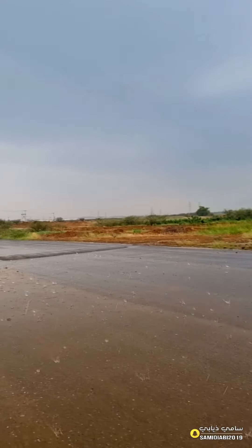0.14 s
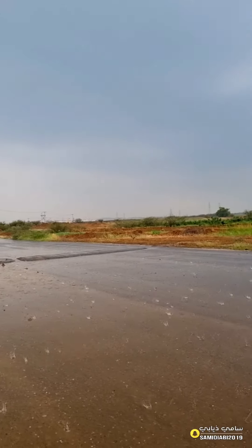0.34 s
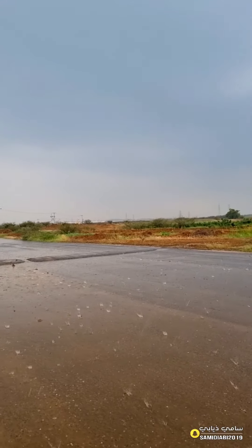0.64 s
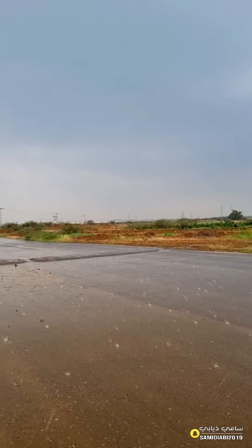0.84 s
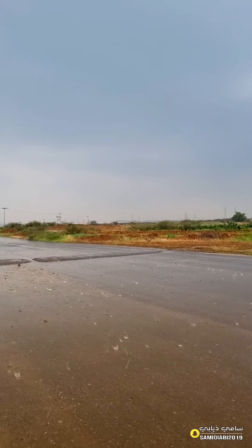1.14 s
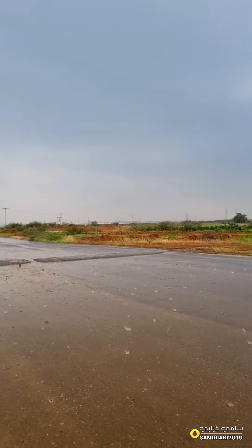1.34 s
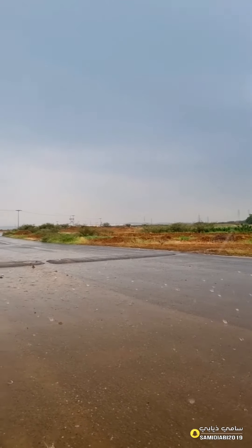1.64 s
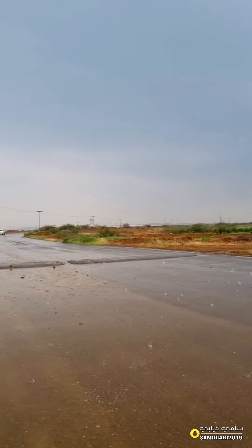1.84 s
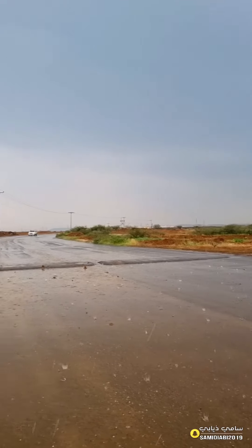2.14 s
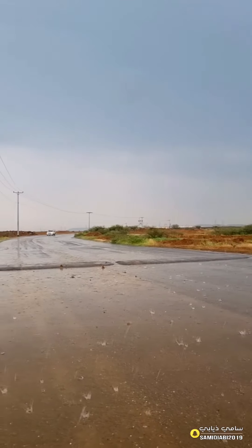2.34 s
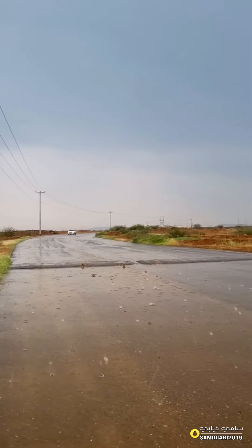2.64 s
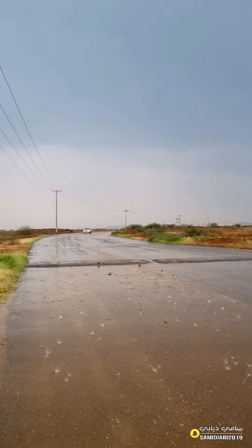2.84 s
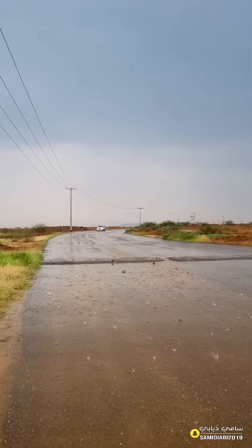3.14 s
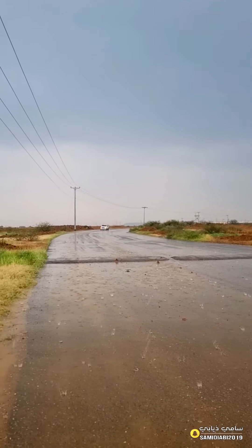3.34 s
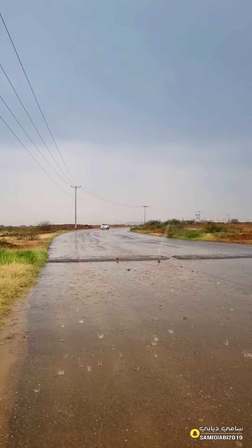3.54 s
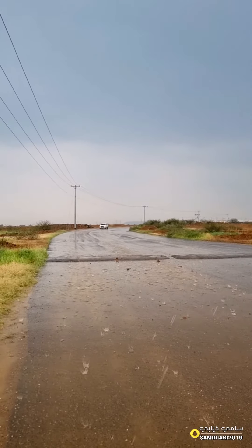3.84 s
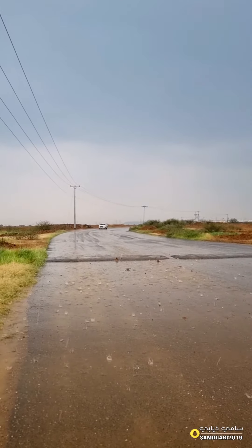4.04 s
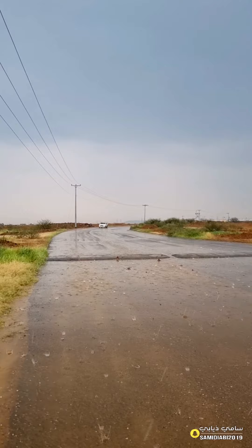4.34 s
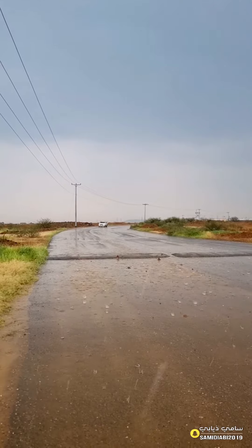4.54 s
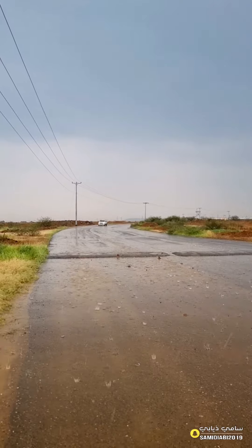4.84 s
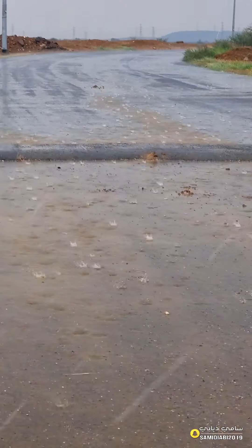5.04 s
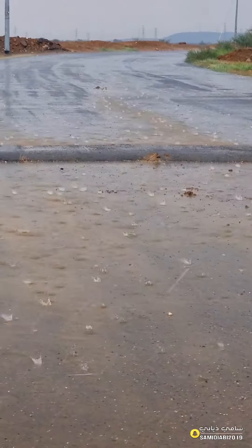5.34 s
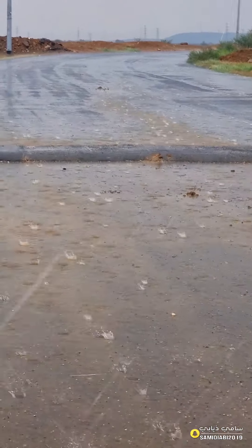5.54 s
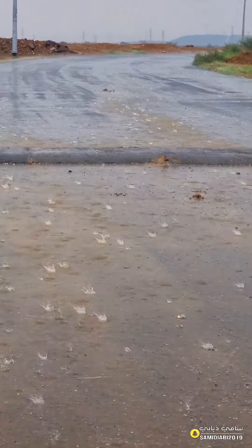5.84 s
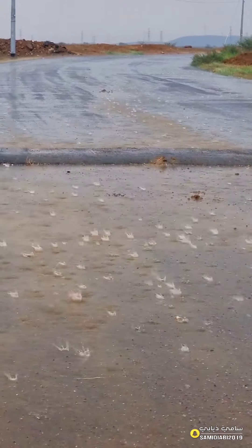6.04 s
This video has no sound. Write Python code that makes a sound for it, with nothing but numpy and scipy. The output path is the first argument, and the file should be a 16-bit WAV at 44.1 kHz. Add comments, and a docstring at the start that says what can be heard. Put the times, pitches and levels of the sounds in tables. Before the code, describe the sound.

A handheld phone under an umbrella hears rain close overhead and on an open asphalt road around. From 0 to 1.5 seconds, scattered dull pops on taut cloth mix with low, uneven wind puffs thumping the microphones, over a faint, steady splashing hiss. From about 1.6 to 3 seconds wind eases and drops come faster, with tight clusters and small wet ticks; crisp road splashes crack around 2.3 and 3.6. The patter thickens through 4 to 4.8, with heavy thuds near 4.35. At 4.93 sound drops out completely for under a tenth of a second. It returns with a different road hiss, a very fine high sizzle and deeper cloth thuds. A sharp splash snaps at 5.36. Wind rises from 5.3, and around 5.9 to 6.15 rough gusts buffet strongly, with a short dull metallic ping at 5.93, a brief sizzle swell, and a final heavy drop near 6.2.

```python
"""Rain pats on the taut cloth of an umbrella just overhead, heard at a handheld phone's two microphones.
Each drop is a slowing swing of the cloth with spray and a dull canopy ring; one drop pings a bare rib.
Splashes on an open asphalt road are clicks and noise merged into hiss, with sharp cracks close by.
Wind is coloured noise, and single gusts are runs of unsteady swings.
Near five seconds the sound drops out briefly; it returns with a changed road hiss, a fine sizzle and rising wind."""
import sys
import numpy as np
from scipy import signal
from scipy.fft import rfft, irfft, next_fast_len
from scipy.io import wavfile
from scipy.ndimage import uniform_filter1d

SR = 44100
rng = np.random.default_rng(int(sys.argv[2]) if len(sys.argv) > 2 else 0)


def generate_wav(signal):
    """Clip the signal to [-1, 1] and save it as 16-bit WAV at the path in sys.argv[1]."""
    frames = np.transpose(np.atleast_2d(signal))
    scaled = np.clip(frames, -1, 1) * 32767
    pcm = np.round(scaled).astype(np.int16)
    wavfile.write(sys.argv[1], SR, pcm)


N = 273850

TIME = np.arange(N) / SR
GRAIN = np.arange(2048) / SR  # time line of one short sound, s
FIRST = int(0.004 * SR)  # samples in the first 4 ms, where struck sounds are levelled
DROPOUT_START_S, DROPOUT_END_S = 4.9341, 4.9994
# how much later the right microphone hears the cloth, before and after the dropout, and its scatter
LAG_EARLY_MS, LAG_LATE_MS, LAG_SCATTER_MS = 0.43, 0.12, 0.18


def undb(db):
    """Decibels to gain."""
    return 10 ** (np.asarray(db) / 20)


def unit(x):
    """Scale to rms 1."""
    return x / np.sqrt(np.mean(x ** 2))


def colour(x, points, causal=False):
    """Filter by (f/Hz, level/dB) points; the causal, minimum-phase form keeps attacks sharp."""
    size = next_fast_len(x.shape[-1] + 512, True) // 2 * 2
    hz, db = np.transpose(points)
    f = np.maximum(np.arange(size // 2 + 1) * SR / size, 1)
    gain = undb(np.interp(np.log(f), np.log(hz), db))
    if causal:
        # folding the cepstrum onto positive time gives minimum phase
        cepstrum = irfft(np.log(gain))
        cepstrum[1:size // 2] *= 2
        cepstrum[size // 2 + 1:] = 0
        gain = np.exp(rfft(cepstrum))
    return irfft(rfft(x, size) * gain)[..., :x.shape[-1]]


def walk(rate):
    """Random levels held for 1 / rate s, smoothed twice and scaled to rms 1."""
    hold = int(SR / rate)
    held = np.repeat(rng.standard_normal(N // hold + 1), hold)
    smooth = uniform_filter1d(uniform_filter1d(held, hold), hold)
    return unit(smooth[:N])


def pair(likeness):
    """White noise at two microphones with the given correlation."""
    mid, side = rng.standard_normal((2, N))
    c = np.clip(likeness, -1, 1)
    opposite = np.array([[1], [-1]])
    return (np.sqrt(1 + c) * mid + np.sqrt(1 - c) * side * opposite) / np.sqrt(2)


def struck(grains):
    """Scale each grain to rms 1 over its first 4 ms."""
    return grains / np.sqrt(np.mean(grains[:, :FIRST] ** 2, axis=1, keepdims=True))


def burst(count, points, decay_s, scatter=0):
    """Short coloured noise bursts, one a row, each shifted up or down in pitch by chance."""
    noise = rng.standard_normal((count, len(GRAIN))) * np.exp(-GRAIN / decay_s)
    speeds = np.exp(scatter * rng.standard_normal(count))
    grains = colour(noise, points, causal=True)
    shifted = [np.interp(GRAIN * speed, GRAIN, grain, right=0) for grain, speed in zip(grains, speeds)]
    return struck(np.array(shifted))


def crack(count, points, decay_s, tilt_db=2.0, bump_db=5.5, bump_hz=2900, bump_octaves=0.35):
    """Short broad ticks, one a row; each has a chance treble tilt and a favoured band of its own."""
    fade = np.exp(-GRAIN / decay_s)
    noise = rng.standard_normal((count, len(GRAIN)))
    tilt, centre = rng.standard_normal((count, 2)).T[:, :, None]
    spectra = rfft(noise * fade)
    f = np.arange(spectra.shape[1]) * SR / len(GRAIN)
    octaves = np.log2(np.maximum(f, bump_hz / 4) / bump_hz)
    bump = np.exp(-((octaves - centre / 2) / bump_octaves) ** 2)
    db = tilt_db * tilt * octaves + bump_db * bump
    # evening out the random spectrum makes the ticks more alike; a mild second fade tightens the tail
    even = spectra / np.abs(spectra) ** 0.6
    ticks = irfft(even * undb(db)) * fade ** 0.2
    return struck(colour(ticks, points, causal=True))


def place(grains, times, db, lag_ms):
    """Lay grains on the time line; a positive lag delays the right microphone, a negative one the left."""
    out = np.zeros((2, N + 2 * len(GRAIN)))
    for grain, t, gain, lag_s in zip(grains, times, undb(db), lag_ms / 1000):
        for side, late_s in enumerate((max(-lag_s, 0), max(lag_s, 0))):
            i = int(np.clip((t + late_s) * SR, 0, N))
            out[side, i:i + len(grain)] += gain * grain
    return out[:, :N]


def road(early_db=-41, late_db=-39.5, rate=2000, spread_db=6.5, grain_db=1, flicker_db=2.5,
         sizzle_db=-39.5, swell_s=6.04, swell_width_s=0.097, swell_db=7.5):
    """Thousands of splashes a second (rate, per microphone), the far ones merging into a smooth hiss."""
    # colours of the rain on the road before and after the dropout: (f/Hz, level/dB)
    early_colour, late_colour = [(290, -4.5), (500, -5), (578, 1), (677, -1.5), (829, 1.5), (1250, 1),
                                 (1890, -3.5), (2750, -1.5), (5830, -9), (6640, -5.5), (8370, -9),
                                 (11000, -11), (12400, -6.5), (14300, -6.5), (15800, -6)], [(350, -30), (600, -12), (1010, -5), (1160, -38),
                                                     (1320, -23), (1490, -7), (1710, -8), (2750, -3.5),
                                                     (4690, -7), (8020, -14), (11000, -19), (14300, -58),
                                                     (22000, -120)]
    # colour of the fine sizzle at the very top after the dropout: (f/Hz, level/dB)
    sizzle_colour = [(7000, -57), (11000, -7), (12400, 5.5), (15500, 3.5)]
    size, draw = rng.standard_normal((2, N)), rng.random((2, N))
    sizes = undb(spread_db * np.minimum(size, 2.5))
    clicks = (draw < rate / SR) * sizes * rng.choice([-1, 1], (2, N))
    fizz = pair(0) + undb(grain_db) * unit(clicks)
    fizz = fizz * undb(flicker_db * walk(200))
    early = unit(colour(fizz, early_colour, causal=True)) * undb(early_db)
    late = unit(colour(fizz, late_colour, causal=True)) * undb(late_db)
    swell = np.exp(-((TIME - swell_s) / swell_width_s) ** 2 / 2)
    sizzle = unit(colour(fizz, sizzle_colour)) * undb(sizzle_db + swell_db * swell)
    return np.where(TIME < DROPOUT_END_S, early, late + sizzle)


def near_splashes(stray_db=-40, spread_db=1.0):
    """Drops shatter on wet asphalt within a step or two: single cracks of their own colour amid strays."""
    # single splashes: (t/s, level over the first 4 ms/dB before the port colour, centre f/Hz,
    # decay of the source noise/s, lag of the right microphone/ms)
    single_splashes = [(0.066, -31.5, 6550, 0.004, -0.4), (1.981, -28, 7100, 0.00079, 0.5),
                       (2.335, -24.5, 3200, 0.00079, 0.16), (2.3984, -30.5, 6500, 0.00056, 0.26),
                       (2.5682, -39, 8200, 0.0008, 0.36), (2.7225, -31.5, 4300, 0.0048, -0.69),
                       (3.261, -37, 6600, 0.0022, 0), (3.6016, -36, 10100, 0.00081, 0),
                       (3.621, -23, 6260, 0.0033, -0.23), (4.0003, -28.5, 7000, 0.0035, 0.1),
                       (4.683, -33, 3560, 0.014, -0.38), (5.361, -17, 2970, 0.0014, .05),
                       (5.431, -46, 2360, 0.0012, 0), (5.7572, -21.5, 4800, 0.0038, -0.051),
                       (5.995, -29.5, 3300, 0.0021, 0), (6.145, -37, 3940, .0015, 0)]
    # colour of the stray splashes: (f/Hz, level/dB)
    stray_colour = [(600, -18), (2700, 11), (4500, 4.5), (7000, -4.5), (10000, 1), (15000, 6.5)]
    times, db, hz, decay_s, lag_ms = np.transpose(single_splashes)
    grains = []
    for f, decay in zip(hz, decay_s):
        points = [(f / 5, -18), (f * 0.75, -9), (f, 0), (f * 1.25, -9), (16000, -13)]
        grains.append(crack(1, points, decay, tilt_db=0, bump_db=0)[0])
    single = place(grains, times, db, lag_ms)
    times = rng.uniform(0, N / SR, size=170)
    db = stray_db + spread_db * rng.standard_normal(len(times))
    db = db + 4 * (times > DROPOUT_END_S)  # louder after the dropout
    lag_ms = rng.uniform(-0.48, 0.48, len(times))
    stray = place(crack(len(times), stray_colour, decay_s=0.0012), times, db, lag_ms)
    return single + stray


def ports(x):
    """The right microphone faces the road and takes more of its treble."""
    # balance of the ports: (f/Hz, left minus right level/dB)
    port_balance = [(500, 9.5), (1300, -2.5), (2500, -3), (4400, -5), (7000, -0.5), (10500, -1),
                    (12500, -4), (15500, -5)]
    hz, db = np.transpose(port_balance)
    return np.array([colour(side, np.c_[hz, sign * db / 2]) for side, sign in zip(x, (1, -1))])


def wind(rumble_db=5.0, flutter_db=-2, turbulence_db=4.5, buffet_db=-21, unrest_db=1.0,
         rumble_limit_db=-36, flutter_onset_db=-40.5, flutter_growth=0.4):
    """Slow eddies rumble at the ports; in a stronger breeze flutter and rough buffeting grow faster."""
    # strength of the breeze, before the trims of each layer: (t/s, level/dB)
    breeze = [(0, -35.5), (.34, -38.5), (.5, -41.5), (.62, -45.5), (.93, -35), (1.13, -45), (1.45, -38.5),
              (1.68, -50), (2.12, -43), (2.38, -48.5), (3.85, -43.5), (4.32, -37), (4.53, -46.5),
              (5.17, -40), (5.36, -32), (5.75, -32), (6.05, -28), (6.21, -33)]
    # colours of the deep rumble, the flutter and the rough buffeting: (f/Hz, level/dB)
    rumble_colour, flutter_colour, buffet_colour = [(15, -34), (30, -4), (50, 4.5), (72, 7.5), (110, 0.5),
                                                    (170, -6.5), (300, -39), (800, -39.5)], [(60, -31), (140, 3), (230, 0),
                                                                    (360, -4), (520, -11), (800, -21),
                                                                    (1500, -47), (4000, -47)], [(250, -9), (550, 3),
                                                                                     (900, -26),
                                                                                     (1500, -17),
                                                                                     (2500, -2),
                                                                                     (6000, -26)]
    low_db = np.interp(TIME, *np.transpose(breeze)) + unrest_db * walk(24.93)
    # flutter_growth is extra dB for each dB of breeze above the onset
    high_db = low_db + flutter_growth * (low_db - flutter_onset_db)
    likeness = np.interp(TIME, [4.8, 5.3], [0.1, 0.35])
    # the rumble stops growing once the breeze reaches the limit
    rumble_level_db = np.minimum(low_db, rumble_limit_db) + rumble_db
    rumble = unit(colour(pair(likeness / 2), rumble_colour)) * undb(rumble_level_db)
    flutter_level_db = high_db + flutter_db + turbulence_db * walk(60)
    flutter = unit(colour(pair(likeness), flutter_colour)) * undb(flutter_level_db)
    eddies = undb(4 * walk(180))
    buffet = unit(colour(pair(0), buffet_colour) * eddies) * undb(high_db + buffet_db)
    return rumble + flutter + buffet


def puffs(wander=0.2612, roughness_db=4.5, hiss_db=-8.5, breakup_db=5.0, stop_share=0.66):
    """Gusts shed eddies off the phone's edge: runs of swings of wandering pitch that build and stop short."""
    # single gusts: (t/s, eddy level at the peak/dB, mid eddy f/Hz, width of the build-up/s,
    # left minus right level/dB, likeness of the microphones/0-1)
    gusts = [(0.018, -35, 213, 0.0072, -2, 0), (0.138, -42, 149, 0.03, 2, 0.2),
             (0.228, -25, 110, 0.0082, 1, 0.7), (0.274, -32.5, 200, 0.014, 3, 0.65),
             (0.317, -29, 127, 0.015, 6, 0.2), (0.371, -27.5, 224, 0.013, 3, .4),
             (0.447, -28, 99.3, 0.0088, 1, 0.36), (0.47, -20, 169.2, 0.0035, -2, 0.75),
             (0.552, -32.5, 162, 0.0094, 2, 0), (0.803, -22, 140, 0.0057, 1, 0.6),
             (.835, -27, 110, .012, 0, 0.7), (0.861, -20.5, 275, 0.013, -0.5, 0.04),
             (0.883, -31, 75, 0.015, 4, 0.6), (0.959, -24.5, 150, 0.015, 3, 0.65),
             (0.977, -25, 290, 0.018, 2, 0.66), (1.248, -27.5, 66, 0.028, 6, 0.4),
             (1.416, -37, 278, 0.018, 0, 0.1), (1.458, -34.5, 80, 0.035, 4, 0.05),
             (1.847, -26, 85, 0.025, 3, 0.05), (2.175, -32, 80, 0.044, -1, 0.2),
             (2.238, -29, 66, 0.02, -3, 0.8), (2.969, -25.5, 83, 0.015, -10, 0.5),
             (4.269, -32.5, 70, 0.066, 14, .3), (5.355, -29.5, 192, 0.035, 12, 0.6),
             (5.41, -32.5, 290, 0.012, -9, 0), (5.465, -33, 150, .016, 0, 0),
             (5.615, -27, 115, 0.038, -1, 0.9), (5.707, -34, 73, 0.049, 2, 1),
             (5.831, -24, 125, 0.022, -5, 0.08), (5.922, -18, 85, 0.0063, 2, 0.75),
             (5.964, -15, 355, 0.015, -0.5, 0.06), (6.011, -18.5, 260, 0.017, 1.5, 0.02),
             (6.053, -17, 300, 0.014, -7, 0.37), (6.075, -16.5, 290, 0.016, -2, 1),
             (6.122, -19, 390, 0.029, 2.5, 0.3)]
    out, span = np.zeros((2, N)), int(0.2 * SR)
    for t, db, hz, width_s, pan_db, likeness in gusts:
        near = slice(max(int(t * SR) - span, 0), int(t * SR) + span)
        age, cycle = TIME[near] - t, int(SR / hz)
        noise = rng.standard_normal((8, 2 * span))[:, :len(age)]
        sway = unit(uniform_filter1d(uniform_filter1d(noise[:6], cycle), cycle))
        # one train of eddies reaches both microphones, and each has one of its own
        phase = 2 * np.pi * np.cumsum(hz * np.exp(wander * sway[:3]), axis=1) / SR
        trains = unit(np.sin(phase) * undb(roughness_db * sway[3:]))
        shared = np.clip(likeness, 0, 1)
        eddies = np.sqrt(shared) * trains[0] + np.sqrt(1 - shared) * trains[1:]
        # each eddy breaks up into a short rush of rough air
        rush = noise[6:] * undb(breakup_db * np.clip(eddies, -2, 2))
        rush_colour = [(hz / 4, -8), (hz * 1.5, 0), (hz * 4.5, -13), (hz * 10, -31), (hz * 30, -60)]
        hiss = unit(colour(rush, rush_colour))
        # the gust stops faster than it builds
        swell = np.exp(-(age / (width_s * np.where(age < 0, 1, stop_share))) ** 2 / 2)
        sides_db = db + np.array([[pan_db], [-pan_db]]) / 2
        out[:, near] += (eddies + undb(hiss_db) * hiss) * swell * undb(sides_db)
    return out


def droplets(rate=130, spread_db=5.0, early_db=-46, late_db=-43.5, low_hz=900, step=1.46, fall_db=-1.46):
    """Tiny droplets tick on the cloth between the larger drops, in five bands that weaken upwards."""
    out = 0
    for k in range(5):
        size, draw = rng.standard_normal(N), rng.random(N)
        # each band ticks at half the rate
        clicks = (draw < rate / 2 / SR) * undb(spread_db * np.minimum(size, 2))
        hz = low_hz * step ** k
        band = [(hz / 4, -20), (hz * 0.7, -5), (hz, 0), (hz * 1.4, -7), (hz * 4, -26)]
        ticks = unit(colour(clicks, band, causal=True))
        lag = int(rng.uniform(0, 2 * LAG_EARLY_MS) * SR / 1000)
        out = out + undb(fall_db * k) * np.array([ticks, np.roll(ticks, lag)])
    return unit(out) * undb(np.where(TIME < DROPOUT_END_S, early_db, late_db))


def rib_ping(time_s=5.9268, level_db=-18.5, rattle=0.94):
    """One drop on a bare rib rings a cluster of modes, roughened by phase noise at each microphone."""
    # modes of the rib: (f/Hz, relative level/dB, time to fall 60 dB/s)
    rib_modes = [(1070, -1, 0.062), (1470, 3.5, 0.032), (2020, 4, 0.037), (2213, -1, 0.042),
                 (2622, 1, 0.072), (2930, 3, 0.058), (3230, -19, .07)]
    hz, db, t60 = np.transpose(rib_modes)[:, :, None]
    jitter = rng.standard_normal((2, len(hz), len(GRAIN)))
    phase = rattle * np.cumsum(jitter, axis=2) / np.sqrt(FIRST)
    modes = undb(db - 60 * GRAIN / t60) * np.sin(2 * np.pi * hz * GRAIN + phase)
    ring = struck(np.sum(modes, axis=1))
    return np.array([place([side], [time_s], [level_db], np.zeros(1))[0] for side in ring])


def cloth_lag(times, bearing):
    """Lag of the right microphone in ms, scattered from drop to drop; shorter after the dropout."""
    middle_ms = np.where(times < DROPOUT_END_S, LAG_EARLY_MS, LAG_LATE_MS)
    return middle_ms + LAG_SCATTER_MS * bearing


def travel(grains, delay_s):
    """Bending waves cross the canopy, the treble first; delay_s is the travel time at 1 kHz."""
    f = np.arange(len(GRAIN) // 2 + 1) * SR / len(GRAIN)
    # group delay falls with the square root of frequency
    return irfft(rfft(grains) * np.exp(-4j * np.pi * delay_s[:, None] * np.sqrt(1000 * f)))


def cloth_hits(times, db, hz, wet_db, lag_ms, first_swing=0.22, swings=2.54, contact_s=0.00024,
               sag_db=-33.0, sag_s=0.0085, spray_db=-1, ring_db=-18, ring_s=0.015, rib_db=-12,
               lead_db=-17, panel_db=-14, panel_s=0.0025, travel_s=0.0008055):
    """A drop snaps the cloth; the dent spreads, so each swing is slower. Spray and a dull ring follow."""
    # colours of the spray and of the canopy's ring: (f/Hz, level/dB)
    spray_colour, ring_colour = [(500, -6), (1300, 1), (1900, 3.5), (2900, 4.5), (4000, -1), (7000, -6),
                                 (10000, -13), (15000, -11)], [(60, -29), (150, 5), (350, 6.5), (700, -11), (1250, 9),
                                                (1900, -3), (2700, 1), (4500, -6), (9000, -38)]
    count = len(times)
    slack, weight, tension, reach, turn, spread = rng.standard_normal((count, 6)).T
    age = GRAIN * hz[:, None] / first_swing
    # the first swings die at once, a weak slow sag lingers
    sag = undb(sag_db + 4.9 * weight[:, None]) * np.exp(-GRAIN / sag_s)
    fade = np.exp(-age / (swings * np.exp(0.27 * slack[:, None]))) + sag
    contact = 1 - np.exp(-GRAIN / contact_s)
    snap = struck(np.sin(np.pi * np.sqrt(age)) * fade * contact)
    # the struck panel sounds a few cycles of its own note
    note = 0.85 * hz * np.exp(0.1 * tension)
    panel = struck(np.sin(2 * np.pi * note[:, None] * GRAIN) * np.exp(-GRAIN / panel_s))
    # the farther off a drop lands, the more its thud is drawn out into a falling chirp
    thud = travel(snap + undb(panel_db) * panel, travel_s * np.exp(0.3435 * reach))
    spray = crack(count, spray_colour, decay_s=0.0012) * undb(spray_db + wet_db[:, None])
    direct = place(thud + spray, times, db, lag_ms)
    # a faint rattle runs ahead through the stiff frame
    lead_times = times - 0.001595 * np.exp(0.31 * spread)
    lead = place(panel + spray, lead_times, db + lead_db, lag_ms)
    # the nearest rib throws the wave back upside down
    rib_times = times + 0.002208 * np.exp(0.5 * reach)
    rib = place(-snap, rib_times, db + rib_db, lag_ms + 0.57 * turn)
    # the whole canopy rings on, reaching each microphone differently
    shiver = undb(ring_db + 2 * spread[:, None]) * (1 - np.exp(-GRAIN / 0.000057))
    ring = []
    for side in range(2):
        grains = burst(count, ring_colour, ring_s, scatter=0.22) * shiver
        ring.append(place(grains, times, db, lag_ms)[side])
    return direct + lead + rib + np.array(ring)


def umbrella(single_db=-6.0, spread_db=4, largest_db=7, small_hz=1350, pitch_scatter=0.29,
             fall_per_db=0.17, small_spray_db=-4, spatter_s=0.014):
    """Single drops, heavy and light, amid random small ones; the larger a small drop, the lower it sounds."""
    # single drops on the cloth: (t/s, level/dB before the single_db trim, nominal f of the first swing/Hz,
    # spray relative to the drop/dB before the spray trim)
    single_drops = [(0.0072, -14.5, 760, -23), (0.021, -12, 930, -12), (0.0359, -18, 940, -23),
                    (0.0847, -27, 1160, 7), (0.12, -20, 774, -13), (0.1298, -20, 724, -5),
                    (0.142, -23, 1000, -6), (0.225, -21.5, 1110, -14), (0.25, -20, 1166, -6),
                    (0.26, -31, 1290, 3.5), (0.307, -18.5, 880, -24), (0.3427, -11.5, 960, -10),
                    (0.355, -19, 890, -10), (0.369, -24, 830.0, -5), (0.5677, -22.5, 990, -27),
                    (0.62, -27, 1160, -4), (0.697, -21, 1530, -4.5), (0.7336, -20.5, 1100, 0),
                    (0.955, -15.5, 710, -6), (1.001, -22, 560, -24), (1.0914, -16, 800, -7),
                    (1.1343, -17.5, 646, -35), (1.217, -17.5, 940, -26), (1.2925, -13.5, 1300, -14),
                    (1.35, -31, 1250, 3), (1.364, -22.5, 1160, -3), (1.524, -22, 1460, -7),
                    (1.665, -14, 1160, -7), (1.6729, -7.5, 780, -18), (1.707, -31, 1310, -9),
                    (1.753, -30.5, 1720, 5), (1.7856, -17.5, 1250, -28), (1.8684, -20, 1150, -8),
                    (1.924, -22.5, 960, -12), (1.96, -26.5, 1350, 5), (1.9808, -16.5, 1390, 1.5),
                    (2.019, -13.5, 1300, -15), (2.0424, -16.5, 920, 2), (2.05, -11.5, 820, -7),
                    (2.0964, -21.5, 1360, -6), (2.1506, -18.5, 1180, -1), (2.157, -23, 1130, -11),
                    (2.162, -21, 1100, -11), (2.259, -26, 1200, 3), (2.313, -26, 1320, 2),
                    (2.369, -25, 1180, -4), (2.3345, -15, 990, -6), (2.398, -21.5, 1080, -2),
                    (2.434, -16.5, 790, -18), (2.4928, -19, 1140, -8), (2.507, -23, 1200, -7),
                    (2.521, -25, 1310, 3), (2.568, -15, 1230, -0.5), (2.582, -21, 1060.0, -19),
                    (2.621, -17, 1000, -9), (2.629, -18.5, 970, -15), (2.6407, -21, 1000, -2),
                    (2.6614, -12.5, 870, -29), (2.68, -25, 1340, -7), (2.7488, -12.5, 746, -10),
                    (2.759, -25, 1060, -8), (2.768, -24, 960, -6), (2.787, -22.5, 980, -1.5),
                    (2.82, -24, 1190, -12), (2.8472, -16.5, 1210, -11), (2.931, -19.5, 780.0, -1.5),
                    (3.0028, -15.5, 774, -3), (3.1129, -19, 1640, -3.5), (3.14, -28, 800, -14),
                    (3.147, -24, 1050, -17), (3.158, -19, 785, -6.5), (3.1794, -17, 940, -22),
                    (3.239, -22, 1100, -13), (3.2505, -14.5, 1100, -19), (3.275, -13.5, 1000, -16),
                    (3.289, -20.5, 870, -23), (3.297, -33, 1000, -14), (3.36, -21, 780, -23),
                    (3.4161, -15, 860, -18), (3.474, -14, 620, -22), (3.6273, -12, 840, -31),
                    (3.6581, -9.5, 670, -11.5), (3.678, -14, 810, -10), (3.691, -17.5, 990, -4),
                    (3.743, -22.5, 1330, -5.5), (3.754, -18, 970, -0.5), (3.841, -15.5, 720, -23),
                    (3.8591, -14.5, 516, -30), (3.875, -18.5, 840, -8), (3.9604, -16.5, 590, -24),
                    (3.9703, -13, 626, -16), (3.984, -28, 1400, 1), (4.001, -16.5, 1200, 1),
                    (4.046, -35, 745, -13), (4.066, -31, 940, -19), (4.0865, -13, 690, -1),
                    (4.0947, -17.5, 1020, -3.5), (4.13, -12.5, 840, -12), (4.139, -13, 1050, -0.5),
                    (4.194, -17, 800, -4), (4.262, -21, 1080, -22), (4.285, -12, 720, -17),
                    (4.3128, -16.5, 975, -12), (4.3412, -10, 716, -2.5), (4.3449, -7.5, 820, -25),
                    (4.351, -14.5, 1140, -18), (4.378, -23, 740, -8), (4.3896, -16, 620, -29),
                    (4.454, -14.5, 960, -19), (4.499, -26.5, 1330, -8), (4.549, -24, 960, -10),
                    (4.5846, -16.5, 686, -10.5), (4.626, -15, 710, -10), (4.6737, -14, 775, -2.5),
                    (4.713, -25, 1100, -9), (4.7423, -18, 1020, -4), (4.763, -18, 1230, -4),
                    (4.7846, -11, 760, -21), (4.811, -18.5, 1090, -20), (4.919, -25, 1570, -1),
                    (5.009, -22.5, 750, -23), (5.022, -19, 675, -18), (5.038, -22, 750, -17),
                    (5.0314, -16, 647, -25), (5.0456, -18, 800, 2), (5.066, -11, 560, -15),
                    (5.09, -17, 710, -19), (5.1, -16, 726, -25), (5.146, -19.5, 880, -6),
                    (5.177, -24, 1300, 2), (5.196, -19, 800, -9), (5.205, -21, 860, -15),
                    (5.271, -24, 1710, -3), (5.2852, -12.5, 560, -5), (5.318, -16.5, 724, -3.5),
                    (5.3453, -10.5, 1230, -4), (5.377, -26, 900, 5), (5.4043, -19.5, 1090, 2),
                    (5.4145, -18, 640.0, -17), (5.4314, -26, 1370, 12), (5.4472, -25, 950, 6),
                    (5.476, -27, 1400, 12), (5.5105, -30, 1140, 10), (5.5349, -13, 470, -8),
                    (5.55, -26, 980, 14.5), (5.583, -23, 626, 2), (5.601, -26.5, 1150, 7.5),
                    (5.6455, -11.5, 580, -9.5), (5.737, -22, 750, -2), (5.7935, -20, 640, -13),
                    (5.838, -16, 960, -23), (5.8463, -17.5, 695, -22), (5.857, -20, 965, -22),
                    (5.8718, -9.5, 420, -30), (5.8838, -14, 740, -7), (5.927, -19.5, 1540, -14),
                    (6.055, -16, 705, -15), (6.084, -21, 1250, -16), (6.0886, -13, 1020, -24),
                    (6.116, -17, 990, -19), (6.12, -18, 900, -21), (6.1281, -24, 1100, -10),
                    (6.1398, -20, 1090, -15), (6.193, -8.5, 656, -9.5)]
    # the patter strengthens, then weakens a little after the dropout:
    # (t/s, level of a typical small drop/dB before the canopy colour)
    patter = [(.25, -58), (.6, -46), (2.2, -41.5), (4.8, -36), (5.3, -40.5)]
    times, db, hz, wet_db = np.transpose(single_drops)
    lag_ms = cloth_lag(times, rng.standard_normal(len(times)))
    single = cloth_hits(times, db + single_db, hz, wet_db, lag_ms)
    # each single drop throws one small drop a moment later
    spatter = times + spatter_s * rng.exponential(size=len(times))
    times = np.concatenate([rng.uniform(0, N / SR, size=460), spatter])
    size, pitch, wet, bearing = rng.standard_normal((len(times), 4)).T
    size_db = np.minimum(spread_db * size, largest_db)
    db = size_db + np.interp(times, *np.transpose(patter))
    hz = small_hz * np.exp(pitch_scatter * pitch - fall_per_db * size_db)
    small = cloth_hits(times, db, hz, small_spray_db + 4 * wet, cloth_lag(times, bearing),
                       sag_db=-38, ring_db=-14.5, panel_db=-15)
    return single + small


def scene():
    """Umbrella overhead, road all round, wind on the phone."""
    # body resonances of the canopy, heard in every drop on its cloth: (f/Hz, level/dB)
    canopy = [(250, 0.5), (360, 1), (450, -1), (600, 0), (830, -1), (1250, 3), (1650, -2.5), (2700, 1),
              (3800, -0.5), (5500, -0.5)]
    overhead = colour(umbrella(), canopy, causal=True) + droplets() + rib_ping()
    return overhead + ports(road() + near_splashes()) + wind() + puffs()


def record(dry):
    """The sound is limited to full scale, drops out for a moment and has no treble above 15.9 kHz."""
    live = (TIME < DROPOUT_START_S) | (TIME > DROPOUT_END_S)
    # steep low-pass
    top_cut = signal.ellip(10, 0.2, 70, 15900, fs=SR, output="sos")
    return signal.sosfilt(top_cut, np.clip(dry, -1, 1) * live)


dry = scene()
out = record(dry)
generate_wav(out)
```